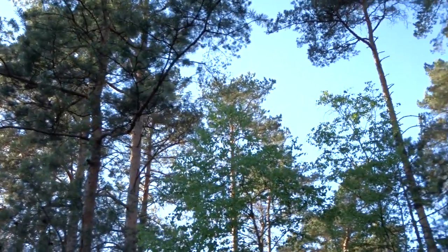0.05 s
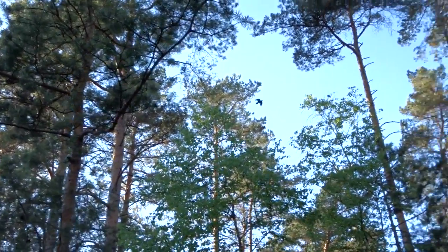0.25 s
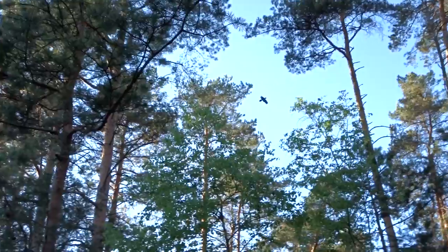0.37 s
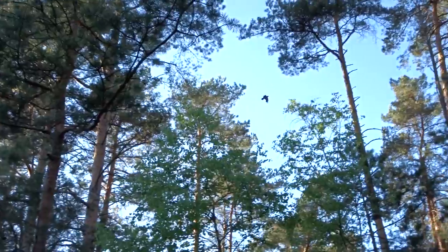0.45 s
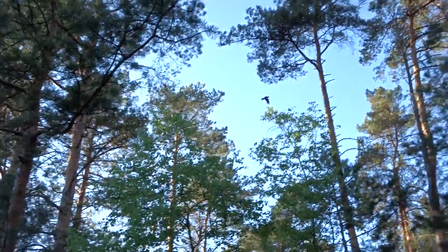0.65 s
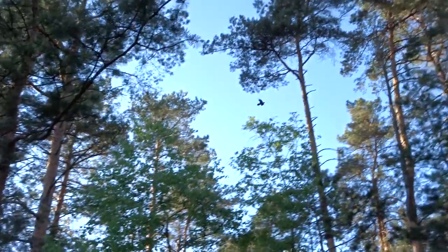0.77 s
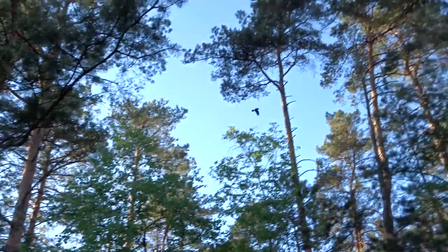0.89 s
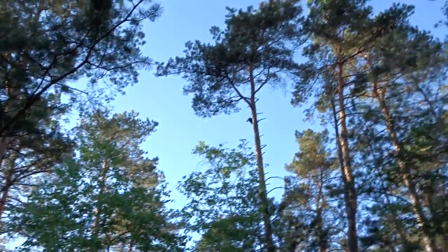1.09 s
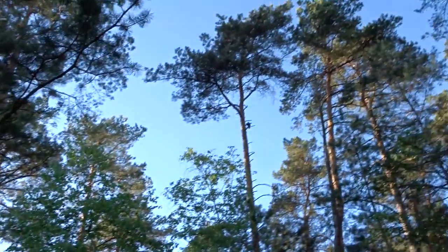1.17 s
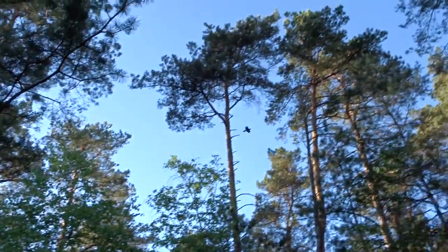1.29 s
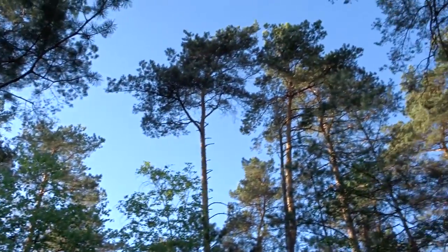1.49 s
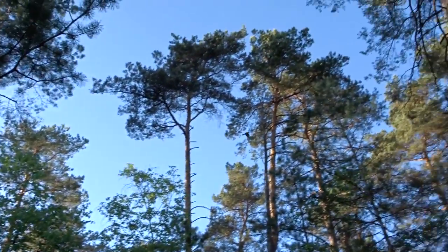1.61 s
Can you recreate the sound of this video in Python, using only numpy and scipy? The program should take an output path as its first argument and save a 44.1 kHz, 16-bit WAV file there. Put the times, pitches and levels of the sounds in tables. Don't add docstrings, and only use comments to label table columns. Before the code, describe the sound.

A crow calls over a pine forest. At the start the echo of an earlier caw fades, with a quick cluster of tiny, bright plastic ticks from the handheld camera near 0.2 s. A harsh, nasal, rattling caw sounds from 0.27 to 0.52 s, its echo spreading among trunks. A second, slightly duller caw comes at 1.14-1.39 s, then faint ticks and echo over quiet distant air.

```python
import sys
import numpy as np
from scipy import signal
from scipy.fft import rfft, irfft, next_fast_len
from scipy.io import wavfile
from scipy.ndimage import uniform_filter1d

SR = 44100
rng = np.random.default_rng(int(sys.argv[2]) if len(sys.argv) > 2 else 0)


def invert_db(x):
    u = np.asarray(x, float) / 20
    return 10 ** u


def file_out(sig):
    cols = np.atleast_2d(sig).T
    lim = np.clip(cols, -1, 1)
    pcm = np.round(lim * 32767).astype(np.int16)
    wavfile.write(sys.argv[1], SR, pcm)


N = 72765
AHEAD = SR

ECHO_DB = [
    -1,
    -1.5,
    0,
]


def crow():
    # time in seconds, effort in dB, beak opening from 0 to 1.
    gestures = [
        [(.274, -50, 0), (.29, -18, 0.39), (.303, -27.5, 0), (.328, -16, 0.42), (.358, -16.5, 0.99),
         (.41, -13, 0.74), (.48, -15.5, 0.95), (.503, -18, 0.92), (.522, -29, 1)],
        [(1.137, -34, 0.04), (1.158, -24, 0.04), (1.2, -20, 0), (1.216, -17.5, 0.7), (1.276, -14.5, 0.99),
         (1.34, -15.5, 0.7), (1.37, -14.5, 1), (1.379, -17, 0.8), (1.388, -48, 1)],
    ]
    # time in seconds, pitch in Hz, rattle depth in dB.
    membranes = [
        [(.274, 365, 24), (.31, 376, 18), (.34, 388, 10), (.38, 390, 7), (.43, 387, 6), (.478, 384, 5),
         (.498, 345, 2), (.515, 310, 2)],
        [(1.137, 352, 24), (1.19, 365, 16), (1.205, 372, 13), (1.22, 384, 8), (1.27, 383, 5.5), (1.3, 385, 4.5),
         (1.365, 381, 4.5), (1.378, 310, 2)],
    ]
    # time in seconds, rattle beats so far (a count).
    rattles = [
        [(.27, -1), (.2795, 0), (.289, 1), (.313, 3), (.3285, 4), (.342, 5), (.36, 6), (.398, 8), (.538, 15)],
        [(1.1345, -1), (1.1495, 1), (1.1588, 2), (1.1704, 3), (1.1841, 4), (1.211, 6), (1.2267, 7), (1.2625, 9),
         (1.401, 16)],
    ]
    shines = [
        0.5,
        -2,
    ]
    stretches = [
        1,
        1.05,
    ]
    calls = list(zip(gestures, membranes, rattles, shines, stretches))
    tracks = np.zeros((len(ECHO_DB), N + AHEAD))
    earlier_s, earlier_db = -.57, 1
    add(tracks[0], gestures[0][0][0] + earlier_s, invert_db(earlier_db) * caw(*calls[0]))
    for track, call in zip(tracks[1:], calls):
        add(track, call[0][0][0], caw(*call))
    return tracks


def caw(gesture, membrane, rattle, shine_db, stretch):
    s, *columns = np.transpose(gesture)
    t = s[0] + np.arange(SR // 2) / SR
    effort_db, beak = [np.interp(t, s, c) for c in columns]
    when, *columns = np.transpose(membrane)
    hz, depth_db = [np.interp(t, when, c) for c in columns]
    beat = np.interp(t, *np.transpose(rattle))
    phase = membrane_phase(t, hz, depth_db, beat)
    at, size_db = slap_train(phase, depth_db, beat)
    return throat(at, size_db, effort_db, beak.clip(0, 1), t < s[-1], shine_db, stretch)


def membrane_phase(t, hz, depth_db, beat):
    swing, swing_skew, fastest_at = .102, .03, .25
    lock_db = 9
    turn = 2 * np.pi * (beat - fastest_at)
    phase = np.cumsum(hz * (1 + swing * np.cos(turn) + swing_skew * np.cos(2 * turn))) / SR
    on = np.flatnonzero(np.diff(np.floor(beat)))
    locked = depth_db[on] > lock_db
    miss = (np.round(phase[on]) - phase[on]) * locked
    shift = np.where(locked, miss, miss[miss != 0][-1])
    return np.maximum.accumulate(phase + np.interp(t, t[on], shift))


def slap_train(phase, depth_db, beat):
    jitter, scatter_db = .006, 1.3
    ramp_power, fall = 2.4, .3
    chance = rng.standard_normal((300, 2))
    n = np.arange(len(phase))
    k = np.arange(1, min(phase[-1], len(chance)))
    at = np.interp(k + jitter * chance[:len(k), 0], phase, n)
    place = (np.interp(at, n, beat) - .05) % 1
    ramp = np.maximum(place ** ramp_power, 1 - np.sqrt(place / fall))
    size_db = np.interp(at, n, depth_db) * (ramp - 1) + scatter_db * chance[:len(k), 1]
    return at, size_db


def throat(at, size_db, effort_db, beak, sounding, shine_db, stretch):
    # centre in Hz, width in Hz, level in dB.
    shut_peaks = [(380, 270, -10.5), (922, 233, 6.5), (1540, 576, -4.5), (2514, 990, -6),
                  (3405, 1500, -8.5), (5040, 1200, -24), (6870, 310, -17)]
    # centre in Hz, width in Hz, level in dB.
    open_peaks = [(421, 280, -15.5), (870, 480, -9), (1129.7, 103.7, 8.5), (1215, 102, 6.5), (1675, 153, 1),
                  (2662, 420, -4.5), (3636, 1310, -7), (4850, 2940, -14.5), (7000, 390, -34),
                  (10100, 2700, -21.5)]
    cut_hz, cut_power = 1300, .35
    steep_hz, sharpest_q = 2000, 6.5
    glow = .2
    breathy = .28
    taps = at.astype(int)[:, None] + np.arange(-8, 9)
    kernel = np.sinc(taps - at[:, None]) * np.hanning(taps.shape[1] + 2)[1:-1]
    length = len(beak)
    hiss = rng.standard_normal(length)
    voice = 0
    for peaks, share in ((shut_peaks, 1 - beak), (open_peaks, beak)):
        bright_db = shine_db + glow * share * beak * (effort_db - effort_db.max())
        for order, (centre, width, db) in enumerate(peaks):
            size = invert_db(size_db * (centre / cut_hz) ** cut_power)
            pulses = (size[:, None] * kernel).ravel()
            slaps = np.bincount(taps.ravel().clip(0), pulses, length + 9)[:length]
            puffs = breathy * np.sqrt(abs(uniform_filter1d(slaps ** 2, 40, origin=19))) * hiss
            octaves = max(np.log2(centre / cut_hz), 0)
            source = (slaps + puffs) * share * invert_db(effort_db + db + bright_db * octaves) * sounding
            if centre > steep_hz:
                narrow = min(width, centre / sharpest_q)
                ringing = filtered(source, lambda f: band(f, centre * stretch, narrow) ** 2)
            else:
                ringing = filtered(source, lambda f: band(f, centre, width))
            voice = voice + (-1) ** order * ringing
    return 20 * neck(voice)


def neck(x):
    low_hz, dull_hz = 313, 7220

    def response(f):
        valley = 1 - 0.59 * band(f, 659, 458)
        low_cut = band(f, low_hz, low_hz) * 1j * f / low_hz
        dull_top = band(f, dull_hz, dull_hz) * dull_hz / (1j * f + 1)
        return valley * (low_cut * dull_top) ** 2

    return filtered(x, response)


def forest(x, echo_db):
    # frequency in Hz, 60 dB decay time in seconds.
    far_decay = [(300, 1.56), (1100, 2.31), (2000, 1.55), (3500, 0.95), (7000, 0.87), (12000, 0.68)]
    far_db, wide_db = -16.5, -11
    near_db, near_t60_s = -12, .15
    hz, t, z = signal.stft(rng.standard_normal((2, 2 * SR)), SR, nperseg=256)
    far = invert_db(-60 * t / along(far_decay, hz)[:, None]) * (1 - np.exp(-t / 0.051))
    near = invert_db(-60 * t / near_t60_s)
    out = 0
    for shape, db in ((far, far_db + echo_db), (near, near_db)):
        tail = signal.istft(z * shape, SR, nperseg=256)[1]
        out = out + invert_db(db) * tail / np.linalg.norm(tail[0])
    delayed = np.pad(x, (200, 0))
    mid, side = signal.fftconvolve(delayed[None], out, axes=1)[:, :len(x)]
    return np.array([mid + invert_db(wide_db) * side, mid - invert_db(wide_db) * side])


def camera():
    # start in seconds, peak level in dB, ring frequency in Hz, 60 dB decay time in seconds.
    tick_rows = [(.1916, -14, 8800, .0035), (.1969, -19, 9900, .003), (.2014, -19, 10000, .003),
                 (.205, -19, 10600, .003), (.2058, -24, 7000, .004), (.2064, -23, 10500, .004),
                 (.2068, -27, 1300, .01), (1.374, -43, 9500, .01), (1.4415, -38, 3500, .006),
                 (.323, -40, 9800, .005), (.33, -39, 9600, .005), (.72, -47, 9500, .005)]
    # frequency in Hz, level in dB.
    shell_spectrum = [(2000, -32), (7000, -14), (8500, -17), (10500, -18), (12500, -30)]
    crack, low_hz = .55, 400
    shell_db, shell_t60_s, pan_db = -19, .14, -2.5
    track = np.zeros(N + AHEAD)
    t = np.arange(SR // 20) / SR
    for s, db, hz, t60 in tick_rows:
        ring = np.sin(2 * np.pi * hz * t) + crack * rng.standard_normal(len(t))
        add(track, s, invert_db(db - 60 * t / t60) * (1 - np.exp(-t / .0001)) * ring)
    track = filtered(track, lambda f: (1j * f / (low_hz + 1j * f)) ** 2 / (1 + (f / 14000) ** 4))
    t = np.arange(SR // 4) / SR
    tail = filtered(rng.standard_normal((2, len(t))), lambda f: invert_db(along(shell_spectrum, f)))
    tail = tail * invert_db(-60 * t / shell_t60_s)
    tail[1] = 1.7 * tail[0] + .3 * tail[1]
    rustle = signal.fftconvolve(track[None], tail / np.linalg.norm(tail[0]), axes=1)[:, :len(track)]
    return (track + invert_db(shell_db) * rustle) * invert_db([[pan_db / 2], [-pan_db / 2]])


def air():
    # frequency in Hz, level in dB per Hz.
    air_spectrum = [(24, -75), (60, -36), (200, -13.5), (400, -10.5), (900, -9.5), (2500, -24.5),
                    (9500, -27), (16000, -38.5)]
    # frequency in Hz, rms level in dB.
    whine_tones = [
        (15625, -79),
    ]
    air_db, wide_db = -55, -15.5
    z = signal.stft(rng.standard_normal((2, N + 512)), nperseg=512)[2]
    patches = uniform_filter1d(uniform_filter1d(rng.standard_normal(z.shape[1:]), 6, 0), 10, 1)
    pair = signal.istft(z * invert_db(0.5 * unit(patches)), nperseg=512)[1][:, :N]
    mid, side = unit(filtered(pair, lambda f: invert_db(along(air_spectrum, f))))
    hz, db = whine_tones[0]
    whine = np.sqrt(2) * invert_db(db) * np.sin(2 * np.pi * hz * np.arange(N) / SR)
    return invert_db(air_db) * np.array([mid + invert_db(wide_db) * side, mid - invert_db(wide_db) * side]) + whine


def band(f, hz, width):
    return 1j * f * width / (hz * hz - f * f + 1j * f * width)


def filtered(x, response):
    m = next_fast_len(x.shape[-1] + SR // 4)
    return irfft(rfft(x, m) * response(np.fft.rfftfreq(m, 1 / SR)), m)[..., :x.shape[-1]]


def along(points, hz):
    f, v = np.transpose(points)
    return np.interp(np.log(hz + 1), np.log(f + 1), v)


def unit(x):
    return x / np.sqrt(np.mean(x ** 2) + 1e-20)


def add(track, s, sound):
    part = track[round(s * SR) + AHEAD:][:len(sound)]
    part += sound[:len(part)]


def scene():
    pan_db = -1.43
    wood = sum(track + forest(track, db) for track, db in zip(crow(), ECHO_DB))
    near = wood * invert_db([[pan_db / 2], [-pan_db / 2]]) + camera()
    return near[:, AHEAD:] + air()


def band_limit(x):
    return signal.sosfilt(signal.butter(12, 16630, fs=SR, output="sos"), x)


def record(dry):
    top_hz = 16300
    mix = filtered(dry, lambda f: f < top_hz)
    return band_limit(mix)


dry = scene()
out = record(dry)
file_out(out)
```